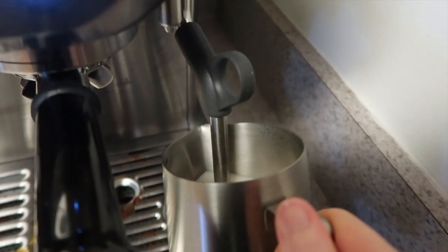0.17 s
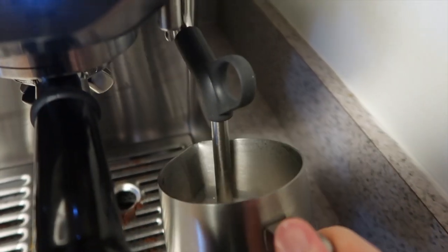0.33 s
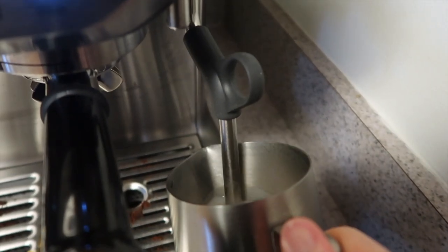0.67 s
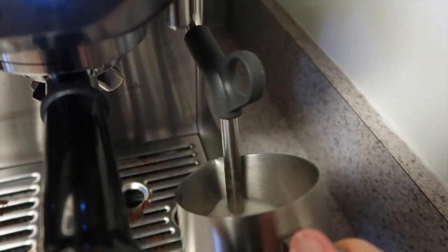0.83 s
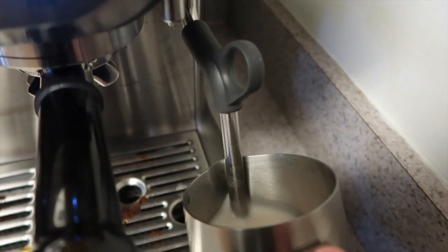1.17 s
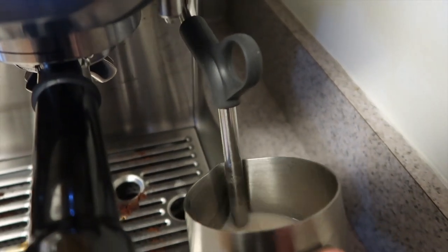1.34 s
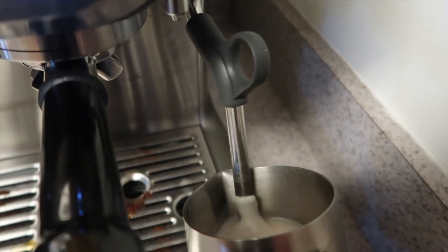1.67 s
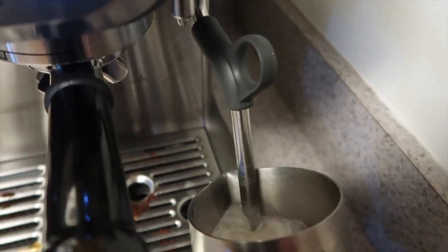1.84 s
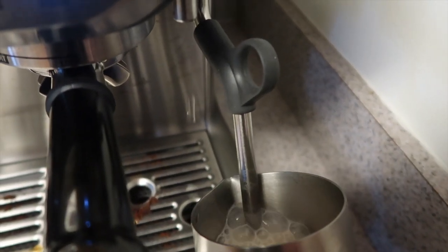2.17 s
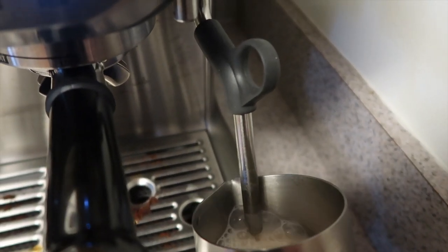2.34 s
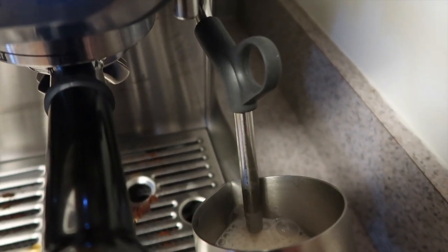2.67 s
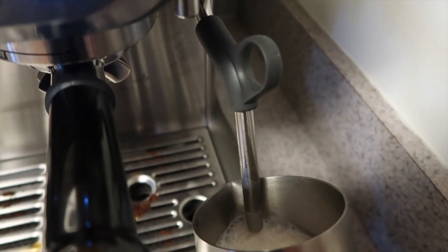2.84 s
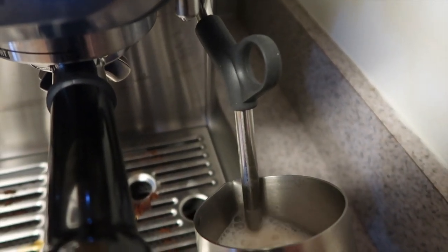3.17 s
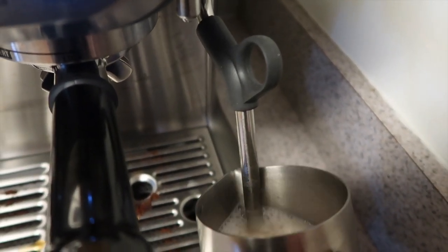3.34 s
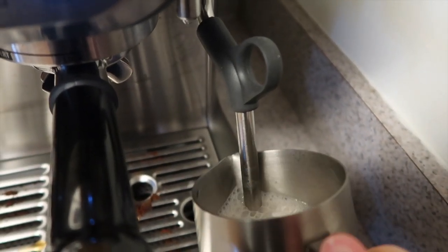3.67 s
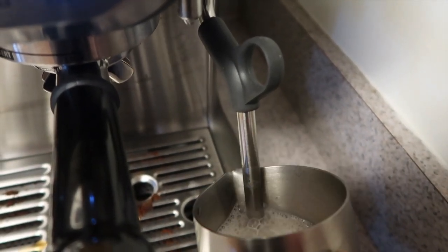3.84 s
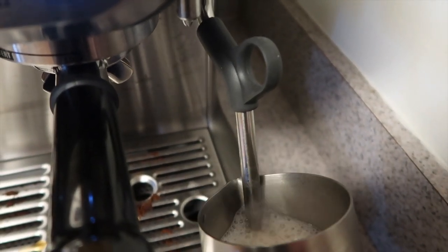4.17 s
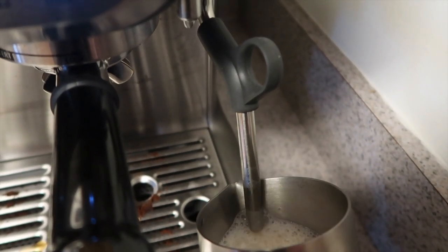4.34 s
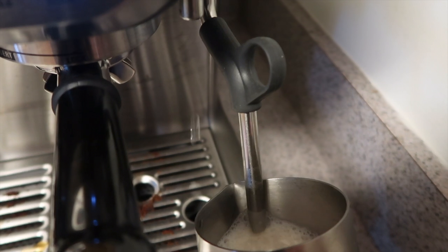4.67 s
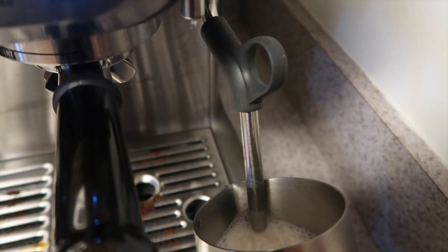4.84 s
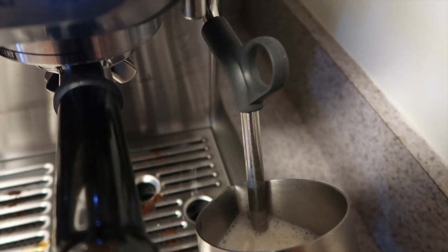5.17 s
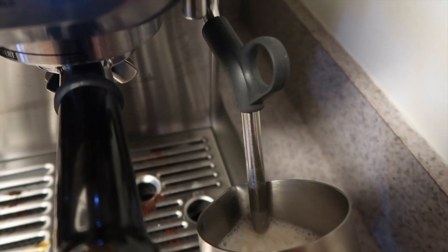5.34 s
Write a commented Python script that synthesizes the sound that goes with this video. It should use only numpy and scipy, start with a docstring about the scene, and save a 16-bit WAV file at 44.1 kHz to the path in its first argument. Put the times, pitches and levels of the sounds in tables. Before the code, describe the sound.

A steam wand froths milk in a steel pitcher, heard close up. It opens with a bright, steady hiss, fuzzy whistling and a high, wavering screech. The pitcher knocks the machine right at the start, ringing the drip tray, with a few softer knocks within the first second. The hiss swells around 1.5 seconds, the milk glugs, and the whistling stops near 1.7. From there the hiss comes in spurts among sharp, ringing pops, squeals and gurgles, sputtering hardest around 3 seconds. From about 3.5 to 4.2 seconds the hiss drops away and screeching and dense popping take over. A softer hiss then returns with crackling foam and scattered pops, while the screech fades toward the end at 5.5 seconds. Throughout, the machine's water pump thumps faintly about twice a second over a barely audible kitchen rumble.

```python
"""A steam wand froths milk in a steel pitcher on a kitchen coffee machine, close to a two-port microphone.
The jet hisses while its tip is clear of the milk; under the milk, collapsing steam screeches and pops.
The pitcher rings with both, its air whistles at first, and the churning milk gurgles and glugs.
Early on the pitcher knocks the machine and rings the drip tray. Behind it the water pump thumps
about twice a second, over a faint room rumble."""
import sys
import numpy as np
from scipy import signal
from scipy.fft import rfft, irfft, next_fast_len
from scipy.io import wavfile
from scipy.ndimage import uniform_filter1d

SR = 44100
rng = np.random.default_rng(int(sys.argv[2]) if len(sys.argv) > 2 else 0)


def master(y):
    """Save y as 16-bit WAV."""
    cut = np.clip(np.atleast_2d(y).T, -1, 1)
    pcm = np.round(cut * 32767)  # scale
    wavfile.write(sys.argv[1], SR, pcm.astype(np.int16))


N = 242991
TIME = np.arange(N) / SR
SLOW = TIME[::32]  # time steps of the controls


def jet():
    """Turbulent hiss with drifting patches, and the crackle of the foam that the jet tears."""
    # spectrum of the hiss: f/Hz, level/dB
    hiss_spectrum = [(150, -31), (900, -8.5), (2100, -11.5), (2700, -3), (4300, -1), (6000, -3.5),
                     (8000, 4.5), (11000, 5.5), (13000, 2), (14300, -9), (15600, -58)]
    # colour of the jet: t/s, bright band f/Hz, tilt above 7 kHz/(dB per octave)
    jet_colour = [(0, 9640, 1), (.8, 9350, 6), (1.7, 10850, 3.5), (2.2, 9100, 11), (2.6, 12640, 11),
                  (3.4, 12000, 12.5), (3.6, 8400, -40), (4.1, 8700, -3), (4.4, 9700, 12), (5.51, 8350, 3.5)]
    # crackle of tearing foam: t/s, level/dB
    foam_levels = [(0, -27), (1.2, -21.5), (1.72, -23.5), (1.76, -28.5), (1.85, -35.5), (2.05, -37),
                   (2.3, -26.5), (2.65, -29), (2.8, -25.5), (3.05, -25.5), (3.35, -25), (3.4, -39),
                   (3.55, -68), (3.8, -38), (3.95, -34), (4.25, -29.5), (4.6, -25.5), (4.7, -23.5),
                   (4.73, -21), (4.775, -19), (4.8, -21.5), (4.86, -19.5), (4.88, -24.5), (4.91, -19),
                   (4.95, -28), (5.06, -28.5), (5.09, -25.5), (5.16, -27), (5.29, -25.5), (5.33, -20),
                   (5.36, -42), (5.51, -27.5)]
    frames, hz = N // 128 + 5, np.fft.rfftfreq(512, 1 / SR)[:, None]
    real, imag, patches, bands = rng.standard_normal((frames, 257, 4)).T
    bands = unit(uniform_filter1d(uniform_filter1d(bands, 2, 0), 70, 1))  # narrow, slow interference
    patches = unit(uniform_filter1d(uniform_filter1d(patches, 5, 0), 16, 1))
    texture = amp(2.6 * patches + 2.4 * bands)
    bright_hz, tilt = follow(jet_colour, np.arange(frames) * 128 / SR)
    hump_db = 1.8 * np.exp(-((hz - bright_hz) / 900) ** 2)
    shape = amp(read(hiss_spectrum, hz) + hump_db + tilt * np.log2(np.maximum(hz, 7000) / 7000))
    shape /= np.sqrt((shape[93:168] ** 2).sum(0))  # even power from 8 to 14.4 kHz
    hiss = unit(signal.istft((real + 1j * imag) * shape * texture, nperseg=512, noverlap=384)[1][:N])
    foam_db, = follow(foam_levels, TIME)
    foam = band(spray(7000, 2.6), 5600, 3000, 3000)
    spurts = amp(1.5 * flutter(.0068))
    crackle = amp(foam_db + 2.2 * flutter(.003)) * foam
    return spurts * steam_supply() * (tip_clearance() * hiss + crackle)


def tip_clearance():
    """Gain of the hiss: faint under the milk, loud while the tip is clear."""
    # spells with the tip clear: t/s, length/s, first level/dB, last level/dB
    clear_spells = [(0, 1.463, -13, -15.5), (1.453, 0.28, -22, -9.5), (1.815, 0.068, -23, -29),
                    (1.9, 0.03, -32, -33), (2, 0.044, -17, -38), (2.084, 0.078, -30, -21.5),
                    (2.181, 0.049, -27, -31), (2.232, 0.034, -26.5, -25), (2.322, 0.33, -20, -13.5),
                    (2.652, 0.26, -12, -11.5), (2.968, 0.048, -22, -27), (3.018, 0.064, -6, -14.5),
                    (3.133, 0.039, -2.5, -10), (3.193, 0.041, -9, -15), (3.245, 0.066, -11.5, -11),
                    (3.325, 0.024, -13.5, -13.5), (3.432, 0.018, -9, -17.5), (4.232, 0.45, -22, -20.5),
                    (4.6, 0.14, -23, -31), (4.695, 0.39, -22.5, -34), (5.051, 0.25, -26, -24),
                    (5.322, 0.21, -17, -20.5)]
    gain = np.full(len(SLOW), amp(-47))  # tip covered
    for start, length, first_db, last_db in clear_spells:
        gate, progress = spell(start, length, rise_s=.015, fall_s=.004)
        gain += gate * amp(first_db + (last_db - first_db) * progress)
    return per_sample(gain)


def steam_supply():
    """Gain of the steam, which falters for moments."""
    # lulls in the steam: t/s, half-width/s, level/dB
    lulls = [(0.116, 0.031, 0), (1.388, 0.025, -2.5), (1.441, 0.016, -4), (1.685, 0.028, -6),
             (1.795, 0.06, -11), (2.938, 0.017, -10.5), (2.031, 0.012, -5), (2.159, 0.0093, -9),
             (2.621, 0.012, -3), (2.801, 0.0079, -8), (3.017, 0.0088, -2.5), (3.142, 0.016, -13),
             (3.18, 0.018, -15), (3.402, 0.0086, -7), (3.517, 0.0086, -6.5), (3.985, 0.014, -1.5),
             (4.1, 0.0053, -13), (3.73, 0.0042, -1), (3.796, 0.0066, -4.5), (4.94, 0.015, -3.5)]
    dips_db = sum(db * np.exp(-((SLOW - s) / width) ** 2) for s, width, db in lulls)
    return per_sample(amp(dips_db))


def screech():
    """A cloud of collapsing bubbles rings at a wandering pitch; single bubbles squeak out of it."""
    gain, hz = bubble_cloud()
    collapses = spray(6000, 1.9)
    haze = band(collapses, hz, 1770, 1570)
    squeaks = np.zeros(N)
    for ratio in (.85, .95, 1.0, 1.06, 1.38):
        pitch = hz * ratio * (1 + .071 * flutter(.018))
        voice = band(collapses, pitch, 420, 450)
        squeaks += amp(7.3 * flutter(.031) - 10.6 * abs(np.log2(ratio))) * voice
    squeaks /= np.sqrt(uniform_filter1d(squeaks ** 2, size=1500))  # they share one supply of steam
    flicker = amp(1.5 * flutter(.0015) + 1.3 * flutter(.017))
    return gain * steam_supply() * flicker * (.2 * unit(squeaks) + .28 * haze)


def bubble_cloud():
    """Gain and pitch of the screech: a slow drift that surges take over."""
    # steam collapsing under the milk: t/s, level/dB, f/Hz
    drift = [(0.0, -20, 3400), (0.2, -16, 3740), (0.26, -21, 3340), (0.66, -20.5, 3630), (1.4, -24.5, 3620),
             (1.78, -24.5, 3260), (2.09, -19, 3200), (2.58, -26, 3540), (2.9, -21, 2900), (2.95, -21, 3700),
             (3.42, -33, 3530), (3.65, -25.5, 3200), (3.7, -20, 3800), (3.99, -26.5, 3600),
             (4.28, -26, 3520), (4.71, -25.5, 2880), (4.8, -30, 4130), (4.99, -22, 3220),
             (5.05, -27.5, 3900), (5.51, -40, 3060)]
    # surges of the screech: t/s, length/s, level/dB, f/Hz
    surges = [(1.4, 0.04, -19, 3350), (1.484, 0.069, -18, 3500), (1.941, 0.02, -22, 3040),
              (2.117, 0.035, -20, 3340), (2.191, 0.019, -16.5, 3050), (2.256, 0.058, -15.5, 3560),
              (2.778, 0.0077, -15, 3600), (2.892, 0.013, -16, 3080), (2.96, 0.013, -22, 3540),
              (3.118, 0.018, -14, 3860), (3.23, 0.02, -34, 3800), (3.357, 0.0092, -16.5, 3840),
              (3.456, 0.069, -14.5, 3450), (3.518, 0.043, -24.5, 3330), (3.57, 0.092, -21, 3200),
              (3.672, 0.062, -19, 3490), (3.774, 0.11, -15, 3590), (3.853, 0.053, -18.5, 3740),
              (3.918, 0.055, -24, 3280), (4.01, 0.055, -15, 3920), (4.093, 0.059, -15.5, 3800),
              (4.137, 0.027, -19, 3500), (4.694, 0.02, -36, 3100), (4.88, 0.034, -39, 4620),
              (5.066, 0.034, -21.5, 4180), (5.297, 0.077, -25.5, 4340)]
    level_db, hz = follow(drift, SLOW)
    gain = amp(level_db)
    for start, length, db, surge_hz in surges:
        gate, _ = spell(start, length, rise_s=.0074, fall_s=.023)
        gain += amp(db) * gate
        hz += (surge_hz - hz) * gate
    return per_sample(gain), per_sample(hz)


def pops():
    """Single steam bubbles collapse with a broad crack and a brief ring."""
    # single collapses: t/s, level/dB, f/Hz, length/s
    collapses = [(0.878, -16, 3480, 0.03), (1.363, -13, 4970, 0.0093), (1.399, -21, 3100, 0.014),
                 (1.6944, -13, 3800, 0.005), (1.72, -12, 4250, 0.011), (1.826, -17, 3590, 0.013),
                 (1.8526, -16, 3070, 0.031), (1.955, -21, 2640, 0.0067), (1.968, -8.5, 3400, 0.0066),
                 (2.012, -14.5, 5130, 0.0083), (2.031, -11, 5020, 0.01), (2.085, -17.5, 2810, 0.0096),
                 (2.118, -7.5, 3524, 0.031), (2.183, -14, 3660, 0.0097), (2.203, -12, 3400, 0.047),
                 (2.221, -13.5, 2590, 0.013), (2.2322, -29, 2530, 0.022), (2.235, -13.5, 4960, 0.016),
                 (2.277, -7, 4900, 0.01), (2.282, -5, 3525, 0.027), (2.317, -7, 5000, 0.014),
                 (2.563, -7.5, 3770, 0.0087), (2.57, -9, 4570, 0.014), (2.587, -12, 4270, 0.005),
                 (2.603, -7.5, 3700, 0.0049), (2.6126, -6, 3660, 0.0031), (2.62, -13, 3700, 0.0058),
                 (2.656, -15, 3850, 0.0069), (2.899, -18, 2630, 0.0073), (2.9265, -10, 4070, 0.0071),
                 (2.952, -22, 2830, 0.05), (2.971, -3.5, 3870, 0.0094), (3.017, -8, 4040, 0.0077),
                 (3.095, -12, 3830, 0.0084), (3.11, -1.5, 4100, 0.0051), (3.115, -3.5, 3800, 0.012),
                 (3.17, -11.5, 3880, 0.0081), (3.205, -18, 3800, 0.0098), (3.2317, -4, 4230, 0.0054),
                 (3.243, -7, 3820, 0.0091), (3.372, -6, 4260, 0.0056), (3.3767, -5, 3700, 0.0043),
                 (3.424, -13.5, 3950, 0.0045), (3.455, -10, 4040, 0.019), (3.466, -7.5, 3560, 0.028),
                 (3.525, -16, 3800, 0.027), (3.547, -15, 3690, 0.017), (3.576, -11, 3110, 0.028),
                 (3.631, -5.5, 3180, 0.034), (3.704, -7.5, 3840, 0.016), (3.733, -8, 3520, 0.017),
                 (3.756, -7, 3370, 0.012), (3.77, -9, 3650, 0.01), (3.7823, -6, 3680, 0.014),
                 (3.813, -9, 3730, 0.021), (3.8375, -6.5, 3660, 0.008), (3.868, -22, 3700, 0.01),
                 (3.89, -20, 3900, 0.0039), (3.887, -22, 2440, 0.016), (3.91, -30, 3760, 0.0078),
                 (3.95, -18, 4770, 0.0072), (3.955, -9, 5190, 0.013), (4.018, -14, 3630, 0.015),
                 (4.04, -9.5, 4130, 0.0084), (4.052, -24, 2560, 0.023), (4.066, -8, 3520, 0.0099),
                 (4.078, -9.5, 3570, 0.016), (4.098, -8, 4000, 0.01), (4.13, -18, 4640, 0.013),
                 (4.163, -6, 3560, 0.0061), (4.17, -16, 3930, .012), (4.179, -20, 5200, .01),
                 (4.205, -14.5, 3920, 0.009), (4.277, -4, 4550, 0.0032), (4.442, -13, 5100, 0.0074),
                 (4.454, -8.5, 5100, 0.0057), (4.694, -28, 2540, 0.014), (4.714, -28, 2450, 0.017),
                 (4.786, -3.5, 5400, 0.0036), (4.787, -5.5, 7000, .008), (4.798, -4, 5250, 0.0037),
                 (4.81, -7.5, 5260, 0.0077), (4.831, -12, 4160, 0.011), (4.844, -16, 4000, 0.0058),
                 (4.8478, -5.5, 4200, 0.007), (4.852, -8, 5150, 0.005), (4.899, -12.5, 5300, 0.0063),
                 (4.912, -30, 4330, 0.0041), (5.033, -14, 3500, 0.0018), (5.077, -9, 5000, 0.0042),
                 (5.107, -8, 4950, 0.0043), (5.128, -12.5, 5300, 0.0042), (5.283, -13, 3900, 0.003),
                 (5.315, -11.5, 5160, 0.0082), (5.324, -21, 4640, 0.0042), (5.3305, -14, 4300, 0.01),
                 (5.384, -13, 3770, 0.0035)]
    out, t = np.zeros(N), np.arange(2600) / SR
    for s, db, hz, length in collapses:
        noise = rng.standard_normal(len(t))
        length = max(length, .002)
        age = t / length
        width_hz = 5.5 / length * (hz / 3600) ** .69  # short and high pops are broad ones
        ring = band(noise, hz, width_hz, width_hz)
        crack = .25 * band(noise, hz, 2000, 2000) * np.exp(-4 * age)
        pop = (ring + crack) * np.sqrt(age) * np.exp(-1.59 * age ** 2)
        add(out, s - .001, amp(db) * pop / abs(pop).max())
    return out


def pitcher(x):
    """The vessel's modes change as it is lowered and the milk detunes them; the mouth shapes the sound."""
    # wall and air modes, peaks and dips: f/Hz, width/Hz, level held high/dB, level lowered/dB
    modes = [(1365, 41, 8, 6), (2038, 160, 5, -27), (2537, 20, -31, 10.5), (2776, 20, 6.5, 10),
             (2860, 120, -1, -9), (3088, 60, 9.5, 6), (3235, 95, 7.5, -3), (3470, 30, -3, 2.5),
             (3612, 71, 5, 7.5), (3825, 94, 5, 3.5), (4020, 160, -21, 4.5), (4330, 210, 4, 4),
             (4480, 190, -5, -1), (4610, 72, -5, 2), (4780, 78, 10.5, -1), (5050, 46, -1.5, 4),
             (5000, 130, -20, 2.5), (5307, 50, 3.5, 4.5), (5370, 290, -11, -2.5), (6000, 88, 5, 4),
             (6156, 106, 9, 7), (6680, 65, 6.5, 1.5), (6760, 140, 2, 5.5), (9900, 54, 7, 0.5),
             (11180, 110, 2, 3), (11050, 43, 4, -2)]
    # response of the pitcher's mouth: f/Hz, level/dB
    mouth = [(120, -18.5), (900, -54), (1400, -0.5), (1750, -2), (2120, -3.5), (2330, -6), (2500, 0.36),
             (3300, -5.5), (3800, -2.37), (4550, -7.5), (5150, -2.4), (5650, -5), (6300, -5), (7500, 1),
             (9000, -1)]
    lowered = np.interp(TIME, [.9, 1.8], [0, 1])
    rings = np.zeros(N)
    for hz, width_hz, high_db, low_db in modes:
        gain = amp(high_db + (low_db - high_db) * lowered + 2.2 * flutter(.1)) - 1
        detuned_hz = hz * (1 + .006 * flutter(.2))
        rings += gain * resonate(x, detuned_hz, max(width_hz, 60))  # the milk damps every wall mode
    return coloured(x + rings, lambda hz: amp(read(mouth, hz) - 4))


def whistles():
    """Turbulence rings in fuzzy, wavering, gliding air modes until the milk covers the tip."""
    # air modes blown by the jet deep in the pitcher: t/s, length/s, f/Hz, end f/Hz, level/dB, fade/dB
    air_modes = [(0, .42, 2740, 2880, -27, -4), (.42, .3, 3100, 3150, -34, -2),
                 (.93, .42, 2760, 2780, -31, -1), (.95, .2, 3080, 3060, -34, -3),
                 (1.25, .11, 3350, 3450, -30, 0), (1.4, .27, 2980, 3150, -31, -3),
                 (1.4, .3, 2780, 2650, -34, -2), (0, .52, 3620, 3680, -29, -3),
                 (0, .5, 3860, 3800, -34, -3), (.52, .72, 3660, 3720, -34.5, 0),
                 (1.46, .2, 3600, 3680, -31, -1), (.03, .9, 4800, 4780, -34, -3),
                 (.1, .7, 5330, 5330, -37, -2), (1.14, .12, 5000, 5180, -32, 2),
                 (1.46, .1, 5000, 5050, -32, -1), (1.5, .1, 5300, 5400, -33, -1),
                 (.25, .55, 6240, 6240, -33, -1), (.95, .14, 5900, 5900, -32, -3),
                 (.368, .215, 1490, 1490, -39, -3), (.033, 1.4, 1970, 1970, -40, -9)]
    edge_s, width_hz, covered_at_s = .03, 120, 1.745
    out = np.zeros(N)
    for start, length, first_hz, end_hz, db, fade_db in air_modes:
        gate, progress = spell(start, length, rise_s=edge_s, fall_s=edge_s / 2)
        span = slice(round(start * SR), round((start + length + 4 * edge_s) * SR))
        glide_hz = per_sample(first_hz + (end_hz - first_hz) * progress)
        hz = (glide_hz * (1 + .005 * flutter(.05)))[span]
        ring = band(rng.standard_normal(len(hz)), hz, width_hz, 2 * width_hz)
        gain = per_sample(gate * amp(db + fade_db * progress)) * amp(2 * flutter(.022))
        out[span] += gain[span] * ring
    return out * steam_supply() * np.clip((covered_at_s - TIME) / .02, 0, 1)


def churn():
    """Bubbling drives the air column above the milk; large bubbles glug with a rising pitch."""
    # large bubbles bursting: t/s, level/dB, starting f/Hz, t60/s, air column level/dB
    glugs = [(0.877, -36, 740, 0.078, -39), (1.653, -12, 420, 0.032, -31), (1.747, -26, 650, 0.031, -51),
             (1.764, -36, 600, 0.058, -43), (1.794, -35, 783, 0.13, -45), (2.043, -39, 780, 0.068, -31),
             (2.079, -43, 423, 0.13, -56), (2.337, -31.5, 650, 0.034, -41.5), (2.778, -27, 732, 0.085, -21),
             (2.832, -24, 708, 0.069, -28), (2.899, -40, 795, 0.032, -13), (3.053, -36, 392, 0.19, -36.5),
             (3.181, -32, 687, 0.057, -33), (3.218, -30, 302, 0.097, -43), (3.267, -29, 690, 0.094, -33),
             (3.332, -29, 310, 0.073, -48), (3.398, -59, 840, 0.079, -30), (4.941, -41, 267, 0.06, -51)]
    column_hz = 1057
    column_gain, slosh_gain = churn_gains()
    column = band(spray(3000, 2.8), column_hz, 85, 900)
    slosh = resonate(spray(900, 1.0), 480 * amp(3.8 * flutter(.022)), 670)
    slosh = unit(resonate(slosh, 490, 1200))
    out = amp(2 * flutter(.035)) * (column_gain * column + slosh_gain * slosh)
    t = np.arange(6000) / SR
    for s, db, hz, t60, ring_db in glugs:
        noise = rng.standard_normal(len(t))
        wobble = 1 + .5 * unit(uniform_filter1d(noise, size=120))  # the foam shakes each bubble
        bubble = amp(db + 1) * np.sin(2 * np.pi * hz * (t + 2.3 * t ** 2))
        ring = amp(ring_db + 6) * np.sin(2 * np.pi * column_hz * t)
        envelope = np.minimum(t / .0073, 1) * amp(-60 * t / t60)
        add(out, s, envelope * wobble * (bubble + ring))
    return coloured(out, lambda hz: hz ** 3 / (hz ** 3 + 260 ** 3))  # too small a vessel to radiate bass


def churn_gains():
    """Gains of the air column and of the slosh: a slow drift with gurgles on top."""
    # churning milk: t/s, air column level/dB, slosh level/dB
    drift = [(0.0, -46, -54.5), (0.17, -52, -37), (0.26, -47.5, -53.5), (0.8, -50, -49.5),
             (0.9, -49, -60.5), (1.47, -48, -56), (1.63, -48, -67), (1.82, -46.5, -54), (2.04, -47.5, -69),
             (2.49, -43, -52), (2.87, -39, -46), (3.25, -51, -47.5), (3.44, -47.5, -69), (4.19, -52.5, -61),
             (4.45, -46, -62), (4.62, -41.5, -55), (4.93, -50.5, -61), (5.51, -46, -51.5)]
    # gurgles: t/s, length/s, air column level/dB, slosh relative to it/dB
    gurgles = [(1.613, 0.07, -32, -6), (1.74, 0.021, -36.5, 3.5), (1.871, 0.016, -34.5, -32),
               (2.005, 0.064, -46, -9), (2.152, .03, -45, -10), (2.756, 0.037, -32.5, -13),
               (2.802, 0.085, -38.5, -8), (2.887, 0.1, -47, -15), (3.011, 0.029, -42, -31),
               (3.277, 0.064, -39.5, -4), (3.381, 0.02, -43, 2.5), (3.686, 0.049, -49, -10),
               (4.23, 0.17, -46.5, -16), (5.253, 0.016, -54, 6)]
    column, slosh = amp(follow(drift, SLOW))
    for start, length, db, slosh_db in gurgles:
        gate, _ = spell(start, length, rise_s=.024, fall_s=.013)
        column += amp(db) * gate
        slosh += amp(db + slosh_db) * gate
    return per_sample(column), per_sample(slosh)


def knocks():
    """Each soft knock rings the drip tray, which goes on rattling briefly."""
    # pitcher against the machine: t/s, level/dB, brightness/(dB per octave)
    blows = [(0.071, -8.5, 2.5), (0.191, -22.5, 2), (0.338, -25.5, 3), (0.417, -26.5, 1.5),
             (0.873, -33.5, 2.5)]
    # modes of the drip tray: f/Hz, level/dB, t60/s
    tray_modes = [(105, 2.5, 0.26), (165, -1, 0.2), (268, -26, 0.13), (419, -10, 0.25), (497, 12, 0.069),
                  (657, 4.5, .06), (740, 16.5, 0.029), (880, 7, 0.025), (1100, 5.5, 0.02), (1276, 4, 0.06)]
    blow_s, rattle_s = .0006, .028
    out, t = np.zeros(N), np.arange(12000) / SR
    blow = t / blow_s * np.exp(1 - t / blow_s)
    for s, db, tilt in blows:
        rattle = rng.standard_normal(len(t)) * np.exp(-t / rattle_s)
        tray = sum(amp(mode_db + tilt * np.log2(hz / 480) - 60 * t / t60) * np.sin(2 * np.pi * hz * t)
                   for hz, mode_db, t60 in tray_modes)
        ring = signal.fftconvolve(blow + rattle, tray)[:len(t)]
        add(out, s + .0009, amp(db) * ring / abs(ring).max())
    return coloured(out, lambda hz: (1j * hz / (1j * hz + 90)) ** 3)  # the tray radiates no deep bass


def pump():
    """A few piston strokes at mains pace shake the housing, and the counter under it thuds."""
    # pump cycles: t/s, level/dB, counter thud level/dB
    cycles = [(0.615, -44, -52), (1.13, -46.5, -61), (1.633, -48.5, -61), (2.165, -45, -67),
              (2.676, -44, -59), (3.196, -49, -71), (3.714, -47.5, -65), (4.232, -46.5, -57),
              (4.748, -42.5, -52), (5.262, -40, -46)]
    # piston strokes within a cycle: t/s, level/dB
    strokes = [(0, 4.5), (0.021, 7.5), (0.041, -4.5), (.065, -20)]
    # spectrum of the housing: f/Hz, level/dB
    housing = [(35, -16), (75, -27), (165, 0), (225, -7), (290, 5.5), (370, -4), (600, -10), (1000, -11),
               (1500, 4.5), (2200, -5), (4000, -44)]
    out, t = np.zeros(N), np.arange(6000) / SR
    for s, db, thud_db in cycles:
        noises = rng.standard_normal((len(strokes), len(t)))
        for (delay, stroke_db), noise in zip(strokes, noises):
            shake = unit(coloured(noise, lambda hz: amp(read(housing, hz))))
            hit = shake * t / .0086 * np.exp(1 - t / .0045)
            tail = shake[::-1] * np.exp(-t / .042)
            add(out, s + delay - .004, amp(db + stroke_db + 9.5) * hit)
            add(out, s + delay - .006, amp(db + stroke_db - 2.5) * tail)
        thud = band(noises[0], 50, 60, 60) * t / .025 * np.exp(1 - t / .022)
        add(out, s - .006, amp(thud_db) * thud)
    return out


def room_tone():
    """The kitchen's faint, slowly swelling rumble."""
    # spectrum of the rumble: f/Hz, level/dB
    rumble = [(13, -48), (22, -37), (43, -11), (119, 9), (171, -47), (249, 11.5), (400, 6.5), (520, -31),
              (880, -120)]
    gain = amp(-74 + 1.5 * flutter(.22))
    return gain * unit(coloured(rng.standard_normal(N), lambda hz: amp(read(rumble, hz))))


def microphone(x):
    """Two close ports hear the treble at unlike level and phase, with echoes that shift as the pitcher sways."""
    # left port relative to right: f/Hz, level/dB
    port_level = [(1700, 0), (2700, 3.8), (4200, 7.5), (6200, 4), (8500, .8), (11000, 0)]
    # left port relative to right: f/Hz, phase/rad
    port_phase = [(1900, 0), (2600, -.1), (3300, -.45), (4500, -1.2), (5250, -1.4), (5800, -2.2),
                  (7400, -2.5), (8200, -2.9), (11000, -3.2), (15000, -3.2)]
    # colour of the echoes: f/Hz, level/dB
    echo_colour = [(100, -26), (800, -46), (1800, -41), (2600, -15.5), (3500, -4), (5500, -3.5),
                   (9000, -7.5), (14000, -10.5)]
    echo_t60_s, sway_hz = .06, .65
    side = np.array([[.5], [-.5]])
    direct = coloured(x, lambda hz: amp(side * read(port_level, hz))
                      * np.exp(1j * side * read(port_phase, hz)))
    tails = rng.standard_normal((3, 2, 6000)) * amp(-60 * np.arange(6000) / SR / echo_t60_s)
    echoes = np.zeros((2, N))
    for k, tail in enumerate(tails):
        sway = np.sqrt(2 / 3) * np.cos(2 * np.pi * sway_hz * TIME + np.pi * k / 3)  # equal-power fades
        echoes += signal.oaconvolve((x * sway)[None], tail / np.linalg.norm(tail[0]), axes=1)[:, :N]
    return direct + coloured(echoes, lambda hz: amp(read(echo_colour, hz)))


def amp(db):
    """Decibels to gain."""
    return 10 ** (np.asarray(db) / 20)


def unit(x):
    """Scales to an rms of one."""
    return x / np.sqrt(np.mean(x ** 2) + 1e-20)


def read(points, hz):
    """Reads a spectrum table on a log-frequency axis."""
    f, value = np.transpose(points)
    return np.interp(np.log(hz + 1), np.log(f + 1), value)


def follow(rows, t):
    """Columns of a control table at the times t."""
    s, *columns = np.transpose(rows)
    return [np.interp(t, s, c) for c in columns]


def per_sample(control):
    """A slow control at every sample."""
    return np.interp(TIME, SLOW, control)


def spell(start, length, rise_s, fall_s):
    """A gate that opens, holds and dies away; and the share of its length that has passed."""
    t = SLOW - start
    opening = np.clip(t / rise_s + (start <= 0), 0, 1)
    closing = np.exp(-np.maximum(t - length, 0) / fall_s)
    return opening * closing, np.clip(t / length, 0, 1)


def add(mix, s, sound):
    """Mixes a sound in at s seconds."""
    part = mix[round(s * SR):][:len(sound)]
    part += sound[:len(part)]


def resonate(x, hz, width_hz):
    """A resonance of gain one that can follow a moving pitch."""
    turn = np.exp(2j * np.pi * np.cumsum(hz * np.ones(len(x))) / SR)
    pole = np.exp(-np.pi * width_hz / SR)
    return 2 * (turn * signal.lfilter([1 - pole], [1, -pole], x / turn + 1e-18)).real


def band(x, hz, first_width_hz, second_width_hz):
    """Two resonances in series at one pitch, scaled to an rms of one."""
    return unit(resonate(resonate(x, hz, first_width_hz), hz, second_width_hz))


def coloured(x, response):
    """Filters by a function of frequency."""
    size = next_fast_len(x.shape[-1] + 4096)
    return irfft(rfft(x, size) * response(np.fft.rfftfreq(size, 1 / SR)), size)[..., :x.shape[-1]]


def flutter(seconds):
    """Random wander of rms one that changes over about this long."""
    steps, size = TIME[::16], max(round(seconds * SR / 16), 2)
    smooth = uniform_filter1d(uniform_filter1d(rng.standard_normal(len(steps)), size), size)
    return np.interp(TIME, steps, unit(smooth))


def spray(per_s, spread_db):
    """A train of tiny collapses, a few much larger than the rest."""
    draw, size, sign = rng.random((3, N))
    strength = amp(-spread_db * np.log(size + .0016))
    return unit(strength * (draw < per_s / SR) * np.sign(sign - .5))


def scene():
    """The pitcher close to the microphone, the machine beside it, the kitchen behind."""
    frothing = pitcher(jet() + screech() + pops()) + whistles() + churn()
    return microphone(frothing + knocks() + pump() + room_tone())


def record(dry):
    """The loudest peaks saturate softly; then a steep low-pass cuts the top."""
    knee, headroom, edge_hz = .7, .25, 15620
    over = np.maximum(abs(dry) - knee, 0)
    soft = dry - np.sign(dry) * (over - headroom * np.tanh(over / headroom))
    low_pass = signal.firwin(511, edge_hz, window=("kaiser", 9), fs=SR)
    return signal.oaconvolve(soft, low_pass[None], "same")


dry = scene()
out = record(dry)
master(out)
```